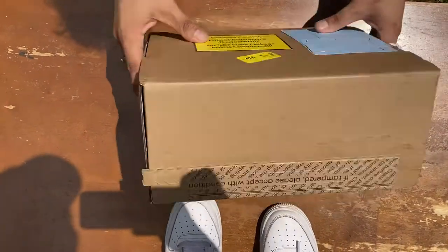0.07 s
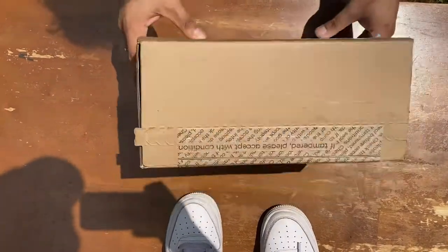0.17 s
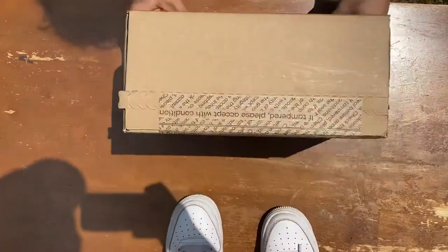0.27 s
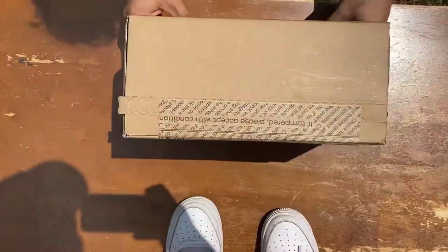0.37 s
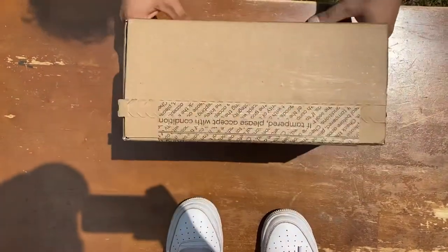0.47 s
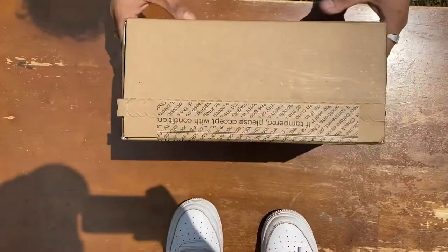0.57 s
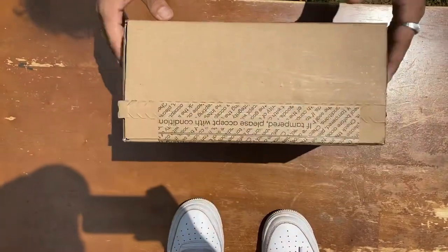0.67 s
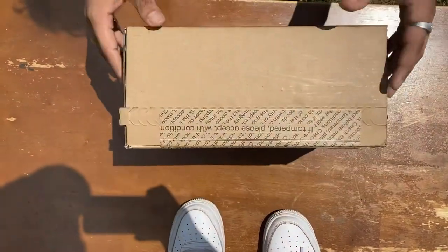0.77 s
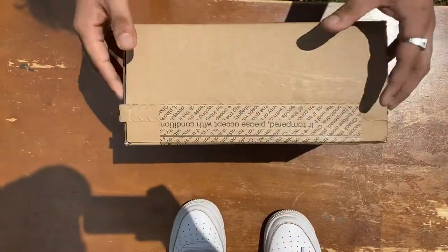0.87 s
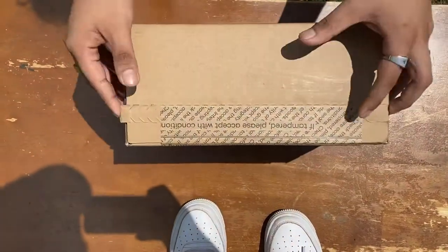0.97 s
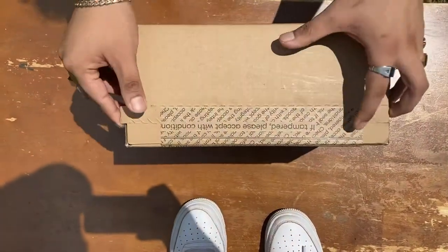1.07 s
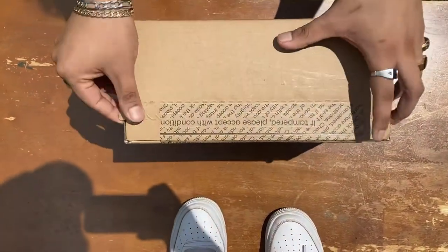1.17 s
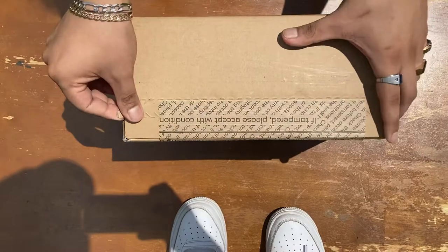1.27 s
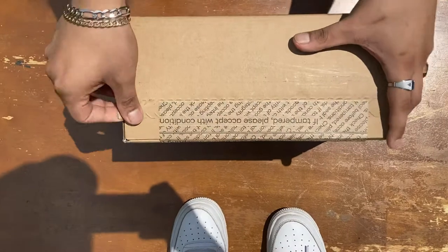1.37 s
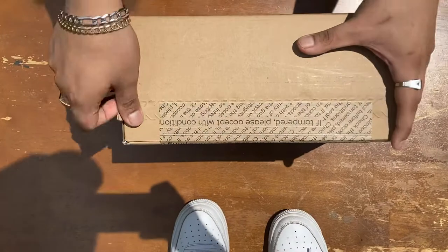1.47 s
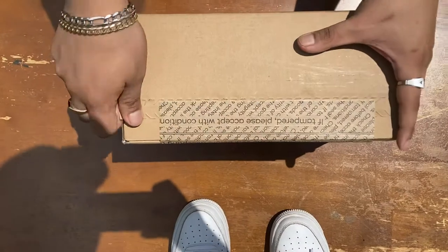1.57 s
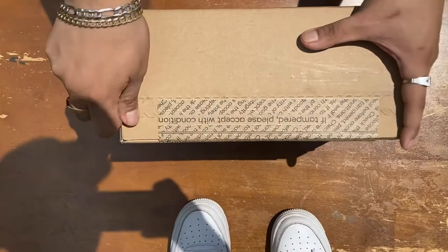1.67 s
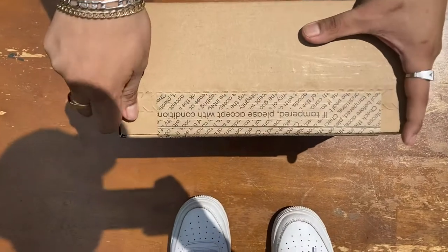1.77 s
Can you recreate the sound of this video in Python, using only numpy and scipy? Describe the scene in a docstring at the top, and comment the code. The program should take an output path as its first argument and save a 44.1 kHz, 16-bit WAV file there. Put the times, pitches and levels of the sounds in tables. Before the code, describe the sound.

Cardboard box clatters down onto wood in quick hollow thumps, followed by faint finger bumps and a nail snap.

```python
"""A cardboard box is set down on a wooden table outdoors: after a light tap, its edges slap the wood one
after another (shaped noise) and its hollow panels boom (decaying modes). Fingers slide as grainy noise and
bump the box softly as they feel for the tear strip; a nail snaps at the tab in short noise bursts.
A light wind buffets the microphone ports as uneven low noise, over a faint outdoor hush of steady noise
with a distant swell, and a far bird chirps in gliding sines with echoes."""
import sys
import numpy as np
from scipy import signal
from scipy.fft import rfft, irfft, next_fast_len
from scipy.io import wavfile
from scipy.ndimage import map_coordinates

SR = 44100
rng = np.random.default_rng(int(sys.argv[2]) if len(sys.argv) > 2 else 0)


def store_wav(level_fs):
    """Save 16-bit WAV to argv[1]."""
    pcm = np.round(np.clip(np.atleast_2d(level_fs), -1, 1) * 32767)
    wavfile.write(sys.argv[1], SR, pcm.T.astype(np.int16))


N = 79380  # samples, 1.8 s


def amp(db):
    """Logarithmic level: decibels to linear gain."""
    return 10 ** (np.asarray(db) / 20)


def unit(x):
    """Power normalization: scale to rms 1."""
    return x / np.sqrt(np.mean(x ** 2) + 1e-20)


def along(points, hz):
    """Logarithmic pitch: interpolate (Hz, value) points on a log-frequency axis."""
    point_hz, values = np.transpose(points)
    return np.interp(np.log(hz + 1), np.log(point_hz + 1), values)


def tilted(spectrum, db_per_octave, centre_hz):
    """Spectral tilt: brighten or darken (Hz, dB) points about a centre frequency."""
    return [(hz, db + db_per_octave * np.log2(hz / centre_hz)) for hz, db in spectrum]


def since(s):
    """Causality: seconds elapsed after s, zero before."""
    return np.maximum(np.arange(N) / SR - s, 0)


def curve(rows):
    """Slow modulation: (s, value) points interpolated to one value per sample."""
    return np.interp(since(0), *np.transpose(rows))


def wobble(rate):
    """Random modulation: a smooth curve through random knots, rate of them a second."""
    return map_coordinates(rng.standard_normal(1024), [since(0) * rate], mode="mirror")


def filtered(x, response):
    """Linear filtering: multiply the spectrum of x by a response of frequency."""
    size = next_fast_len(N + SR // 2)
    spectrum = rfft(x, size) * response(np.fft.rfftfreq(size, 1 / SR))
    return irfft(spectrum, size)[..., :N]


def noise(spectrum, alike):
    """Interchannel coherence: coloured stereo noise of rms 1 whose mid-side balance sets the likeness."""
    def mid_side_gains(hz):
        angle = np.arccos(np.clip(along(alike, hz), -1, 1)) / 2
        return amp(along(spectrum, hz)) * [np.cos(angle), np.sin(angle)]

    mid, side = filtered(rng.standard_normal((2, N)), mid_side_gains)
    return unit(np.array([mid + side, mid - side]))


def burst(s, rise, hold, t60):
    """Transient envelope of one contact: linear rise, hold, exponential decay."""
    return np.minimum(since(s) / rise, 1) * amp(-60 * since(s + rise + hold) / t60)


def ring(modes, s, soft_hz, scatter_db=2.2):
    """Modal superposition: decaying sines after a contact at s; a soft contact spares the high modes."""
    t = since(s)
    out = np.zeros(N)
    for hz, db, t60 in modes:
        decay = amp(db + scatter_db * rng.standard_normal() - 60 * t / t60)
        build_up = 1 - np.exp(-t * hz)  # time constant of one cycle, so low modes build more slowly
        out += decay * build_up * np.sin(2 * np.pi * hz * t) / (1 + (hz / soft_hz) ** 2)
    return out


def echo(x, decay):
    """Diffuse reverberation: convolve with stereo noise whose decay time depends on frequency."""
    hz, t, cells = signal.stft(rng.standard_normal((2, SR // 2)), SR, nperseg=256)
    fading = cells * amp(-60 * t / along(decay, hz)[:, None])
    tail = signal.istft(fading, SR, nperseg=256)[1]
    delayed = np.pad(x, (300, 0))[None]  # reflections start 300 samples late
    return signal.fftconvolve(delayed, tail / np.linalg.norm(tail[0]), axes=1)[:, :N]


# Steady outdoor air. Each row: frequency in Hz, relative level in dB.
HUSH_SPECTRUM = [(40, 12.5), (150, -8.5), (270, -6), (345, 9), (410, -3.5), (480, -1.5), (620, -10),
                 (860, 2.5), (1000, -1.5), (1130, -0.5), (1500, -4), (2100, -8.5), (3100, -10), (4300, -15),
                 (6500, -21.5), (10500, -33), (13000, -29), (16000, -29)]
# Stereo width of the air. Each row: frequency in Hz, left-right likeness as a ratio.
HUSH_LIKENESS = [(200, 0.074), (500, 0.12), (900, 0.037), (2000, 0.046), (3200, 0.95), (4500, 0.94),
                 (6000, 1)]
# Strength of the air. Each row: time in seconds, level in dB.
HUSH_LEVEL_CURVE = [(0, -47.5), (.45, -50.5), (.9, -48.5), (1.4, -51), (1.8, -48)]
# Colour of a distant swell, likely traffic. Each row: frequency in Hz, relative level in dB.
ROAR_SPECTRUM = [(200, -1), (480, -3), (610, -8), (760, -3), (860, 5.5), (1000, -17.5), (1120, -6),
                 (1500, -48), (3000, -50)]
# Strength of the swell. Each row: time in seconds, level in dB.
ROAR_LEVEL_CURVE = [(0, -54), (.5, -62), (1.15, -61.5), (1.4, -50), (1.6, -53), (1.8, -66)]


def hush():
    """Incoherent summation: neighbourhood air and a far swell as two independent, slowly wavering noises."""
    air_level = amp(curve(HUSH_LEVEL_CURVE) + 1.6 * wobble(8.0))
    roar_level = amp(curve(ROAR_LEVEL_CURVE) + 0.36 * wobble(3.8))
    air = air_level * noise(HUSH_SPECTRUM, HUSH_LIKENESS)
    return air + roar_level * noise(ROAR_SPECTRUM, [(500, 1.0), (900, 0.25)])


# Reverberation of the yard. Each row: frequency in Hz, time to fall 60 dB in seconds.
YARD_DECAY = [(80, 0.38), (400, 0.49), (1500, 0.16), (10000, 0.024)]


def yard(knocks, level_db=-24):
    """Frequency-dependent absorption: the yard returns the knocks as a faint tail whose treble dies first."""
    return amp(level_db) * echo(knocks.mean(0), YARD_DECAY)


# Bird notes. Each row: start in seconds, length in seconds, start frequency in Hz, end frequency in Hz,
# level in dB.
CHIRP_NOTES = [(0.57, 0.053, 2847, 2940, -50), (0.659, 0.026, 2880, 2950, -46),
               (0.692, 0.025, 3050, 2875, -55)]


def bird(echo_db=-4):
    """Frequency modulation: thin gliding sines, with diffuse echoes that arrive from all sides."""
    song = np.zeros(N)
    for s, length, start_hz, end_hz, db in CHIRP_NOTES:
        progress = np.minimum(since(s) / length, 1)
        pitch_hz = start_hz + (end_hz - start_hz) * progress
        song += amp(db) * np.sin(np.pi * progress) * np.sin(2 * np.pi * np.cumsum(pitch_hz) / SR)
    return song + amp(echo_db) * echo(song, [(3000, 0.66)])


# Strength of the buffeting. Each row: time in seconds, level in dB.
WIND_LEVEL_CURVE = [(0, -47.5), (.1, -32.5), (.135, -34.5), (.19, -34.5), (.295, -26), (.324, -30),
                    (.37, -31), (.438, -47), (.5, -40), (.574, -35), (.68, -39.5), (.74, -44), (.778, -27),
                    (.85, -27.5), (.95, -30.5), (1.014, -41.5), (1.048, -37), (1.134, -40), (1.2, -34.5),
                    (1.28, -41.5), (1.372, -39.5), (1.426, -52), (1.466, -33.5), (1.53, -48.5),
                    (1.574, -30.5), (1.65, -36), (1.736, -42.5), (1.8, -30)]
# Colour of the buffeting. Each row: frequency in Hz, relative level in dB.
BUFFET_SPECTRUM = [(20, -9), (35, -38), (52, -1), (85, -8), (120, -6.5), (180, -14.5), (300, -25.5),
                   (450, -29.5), (800, -50), (2000, -102.5)]


def wind(lump_db=2.0, lean_db=1.5):
    """Turbulent pressure fluctuation: eddies thump the ports with lumps of their own, stronger at the left."""
    lumps = amp(lump_db * np.array([wobble(45.03), wobble(44.73)]))
    # negative likeness: the ports tend to move oppositely
    buffeting = unit(lumps * noise(BUFFET_SPECTRUM, [(50, -0.38), (300, -0.68)]))
    return amp(curve(WIND_LEVEL_CURVE)) * buffeting * amp([[lean_db], [-lean_db]])


# Fingers sliding on the cardboard. Each row: middle in seconds, half length in seconds (one standard
# deviation of the stroke), level in dB, brightness in dB per octave.
SLIDE_STROKES = [(0.082, 0.2, -61.5, 6), (0.277, 0.007, -55.5, -5), (.62, 0.086, -65, 5),
                 (0.749, 0.017, -57.5, 8), (0.842, 0.047, -64, 7), (1.18, 0.14, -63.5, -5),
                 (1.42, 0.14, -67.5, 10), (1.692, 0.0047, -54, -22), (1.72, 0.083, -68, -4)]
# Hiss of skin on paper before tilting. Each row: frequency in Hz, relative level in dB.
SKIN_SPECTRUM = [(3000, -22), (7000, -4), (8500, 13.5), (10300, 12), (12000, 6), (15200, -3), (16200, -22)]


def fingers(grain_db=2.0):
    """Friction noise: skin hisses over the paper fibres in soft bell-shaped strokes with a fine random grain."""
    out = np.zeros((2, N))
    for s, half, db, tilt in SLIDE_STROKES:
        stroke = np.exp(-((since(0) - s) / half) ** 2 / 2)
        out += amp(db) * stroke * noise(tilted(SKIN_SPECTRUM, tilt, 10500), [(7000, 1.0)])
    return out * unit(amp(grain_db * wobble(680)))


# Nail and fingertip ticks on the cardboard. Each row: start in seconds, snap level in dB,
# board knock level in dB, hold in seconds, time to fall 60 dB in seconds.
TICK_CONTACTS = [(1.229, -30, -43, 0.0001, 0.0072), (1.231, -31, -61, 0.00013, 0.0076),
                 (1.2343, -35, -49, .0003, 0.0073), (1.5895, -57, -42.5, 0.0015, 0.029),
                 (1.7232, -53, -49, 0.0008, 0.0074)]
# Bright snap. Each row: frequency in Hz, relative level in dB.
SNAP_SPECTRUM = [(500, -27), (3400, -1.5), (4800, -21), (6800, 5.5), (9000, 4.5), (12000, 1), (14500, 2),
                 (16500, -3.5)]
# Dry knock of the board. Each row: frequency in Hz, relative level in dB.
BOARD_SPECTRUM = [(200, -25), (650, 6), (1100, 4.5), (1700, 1), (2500, -10), (3150, 8.5), (3700, -9.5),
                  (4400, -9), (5200, -6), (12000, -18.5)]
# Stereo width of snap and knock. Each row: frequency in Hz, left-right likeness as a ratio.
TICK_LIKENESS = [(1000, 0.081), (3000, 0.29), (6000, 0.86)]


def ticks():
    """Impulsive excitation: tiny bright snaps as a nail catches the tab, each with a dry knock of the board."""
    snap, knock = noise(SNAP_SPECTRUM, TICK_LIKENESS), noise(BOARD_SPECTRUM, TICK_LIKENESS)
    out = np.zeros((2, N))
    for s, snap_db, knock_db, hold, t60 in TICK_CONTACTS:
        out += burst(s, 0.00026, hold, t60) * (amp(snap_db) * snap + amp(knock_db) * knock)
    return out


# Modes of the box on the table, before stiffening or damping by the hand. Each row: frequency in Hz,
# relative level in dB, time to fall 60 dB in seconds.
BOX_MODES = [(77.6, -26, 0.24), (115.6, -8.5, 0.11), (196, -16.5, 0.081), (213, -8, 0.092),
             (241.3, -6.5, 0.076), (292, -4, .048), (378.3, -25.5, 0.18), (496, -25.5, 0.08),
             (540.4, -11, 0.036), (670, -26.5, 0.055), (791, -30, 0.08), (1198, -41, 0.2),
             (1627, -37, 0.13)]


def box_boom(s, soft_hz, stiffening=1):
    """Modal resonance: the hollow box sounds its modes, all shifted by one stiffness-dependent pitch ratio."""
    modes = [(hz * stiffening, db, t60) for hz, db, t60 in BOX_MODES]
    return ring(modes, s, soft_hz)


# Fingers bumping the box as they take hold. Each row: start in seconds, level in dB, frequency in Hz
# above which the soft contact excites little, level in dB of the dull push on the table.
BUMP_CONTACTS = [(0.547, -18.5, 80, -41), (0.574, -20, 85, -29), (0.767, -31, 60.5, -17),
                 (0.804, -14.5, 253, -35), (0.827, -18.5, 220, -30), (0.878, -23.5, 258, -35),
                 (0.914, -17.5, 300, -32), (1.04, -15, 150, -28), (1.182, -18.5, 121, -39),
                 (1.455, -12, 59.6, -27), (1.567, -16, 107, -29.5), (1.618, -10, 105, -20),
                 (1.664, -16, 120, -38)]
# Low modes of the table top. Each row: frequency in Hz, relative level in dB, time to fall 60 dB in seconds.
TABLE_MODES = [(59.4, -1.5, 0.084), (111, -14, 0.14)]


def bumps(grip_t60=0.12):
    """Contact damping: soft fingertips thud and stay on the panels; their push passes on into the table."""
    out = np.zeros(N)
    for s, db, soft_hz, push_db in BUMP_CONTACTS:
        grip = amp(db - 60 * since(s) / grip_t60)  # extra decay on top of that of the modes
        out += grip * box_boom(s, soft_hz)
        out += amp(push_db) * ring(TABLE_MODES, s, 400)
    return out


# A light tap on the box while held clear of the table. Each row: start in seconds, ring level in dB,
# rub level in dB.
TAP_CONTACTS = [(0.0668, -24.5, -38.5)]
# Modes of the freely hanging panels. Each row: frequency in Hz, relative level in dB,
# time to fall 60 dB in seconds.
PANEL_MODES = [(195, -5.5, 0.12), (289, 5, 0.057), (643, -14, 0.1), (920, -32, .07), (1390, -18, 0.044)]
# Rub of the touch. Each row: frequency in Hz, relative level in dB.
RUB_SPECTRUM = [(400, 4.5), (900, -15), (1400, 1.5), (2000, 2), (2700, -18.5), (4000, -17), (8000, -60)]
TAP_LAG_S = 0.0059  # the panels answer just after the touch


def taps():
    """Free vibration: after a brief soft rub the hanging panels ring with a clear papery tone."""
    out = np.zeros((2, N))
    for s, ring_db, rub_db in TAP_CONTACTS:
        out += amp(ring_db) * ring(PANEL_MODES, s + TAP_LAG_S, 5000)
        rub = burst(s, rise=.002, hold=.003, t60=.05) * noise(RUB_SPECTRUM, [(1000, 0.11)])
        out += amp(rub_db) * rub
    return out


# Box edges meeting the table. Each row: start in seconds, boom level in dB, boom lag in seconds,
# panel stiffening as a pitch ratio, slap level in dB, slap brightness in dB per octave,
# scuff level in dB, crack level in dB.
EDGE_BLOWS = [(0.1947, -4, 0.00422, 1.01, -22, -9, -39.5, -40.5),
              (0.2246, -7.5, 0.00055, 1.01, -31.5, 1.5, -66, -68),
              (0.2570, -3, 0.00577, 1.03, -18, -0.5, -52, -64), (0.2821, -7, .0105, 0.88, -23, 2, -47, -56)]
# Slap on the wood before tilting. Each row: frequency in Hz, relative level in dB.
SLAP_SPECTRUM = [(60, -32), (200, -9.5), (400, 3), (650, 7.5), (1000, -0.5), (1190, -1), (1400, -3.5),
                 (1660, -5.5), (1790, -17.5), (1950, -10.5), (2180, -28), (2380, -16.5), (3000, -35),
                 (5000, -34.5), (16000, -44)]
# Scuff along the wood. Each row: frequency in Hz, relative level in dB.
SCUFF_SPECTRUM = [(300, 9), (1800, 13), (3700, 2.5), (5500, -4), (8000, 2), (11000, 2.5), (16000, -23)]
# Stereo width of slap and scuff. Each row: frequency in Hz, left-right likeness as a ratio.
SLAP_LIKENESS = [(150, 0.45), (450, 1), (750, -0.45), (1200, -0.071), (2000, 0.089), (4000, 1),
                 (6500, 0.97)]
# Crack of the stiff paper liner. Each row: frequency in Hz, relative level in dB.
CRACK_SPECTRUM = [(1200, 0.5), (1800, 11), (2500, -3), (3100, -14), (3500, 11), (3950, -1), (4300, -21),
                  (8000, -25)]


def box(edge_soft_hz=4000):
    """Impact excitation: each edge cracks, slaps and scuffs, then the box booms at a pitch set by stiffness."""
    out = np.zeros((2, N))
    for s, boom_db, lag, stiffening, slap_db, tilt, scuff_db, crack_db in EDGE_BLOWS:
        slap = noise(tilted(SLAP_SPECTRUM, tilt, 1000), SLAP_LIKENESS)
        scuff = noise(SCUFF_SPECTRUM, SLAP_LIKENESS)
        crack = noise(CRACK_SPECTRUM, [(3500, 0.57)])
        out += amp(boom_db) * box_boom(s + lag, edge_soft_hz, stiffening)
        out += amp(slap_db) * burst(s, rise=.0025, hold=.004, t60=.038) * slap
        out += amp(scuff_db) * burst(s, rise=.001, hold=.004, t60=.036) * scuff
        out += amp(crack_db) * burst(s, rise=.00057, hold=.004, t60=.025) * crack
    return out


def scene():
    """Superposition: box and hands close by, in open air with the yard's reflections."""
    background = hush() + bird() + wind()
    knocks = taps() + box() + bumps()
    return background + yard(knocks) + fingers() + ticks() + knocks


PORT_LAG_S = 7.8e-5  # the left port hears everything a little later
LOW_CUT_HZ, TOP_HZ = 32, 16300


def record(dry):
    """Interaural-style delay: two ports a short lag apart, a second-order low cut and a sharp band limit."""
    def response(hz):
        p = 1j * hz / LOW_CUT_HZ
        low_cut = p * p / (p * p + np.sqrt(2) * p + 1)
        # half the lag each way: left later, right earlier
        ports = np.exp(1j * np.pi * hz * PORT_LAG_S * np.array([[-1], [1]]))
        return low_cut * ports * (hz < TOP_HZ)

    return filtered(dry, response)


dry = scene()
out = record(dry)
store_wav(out)
```